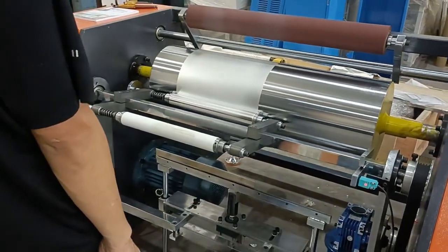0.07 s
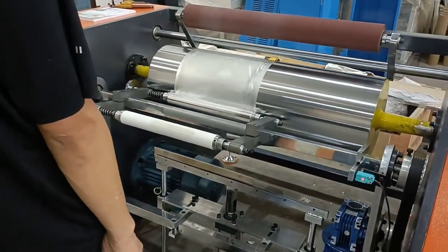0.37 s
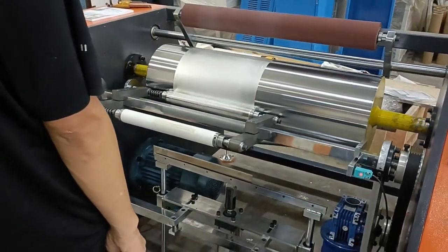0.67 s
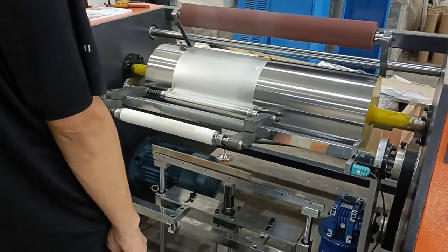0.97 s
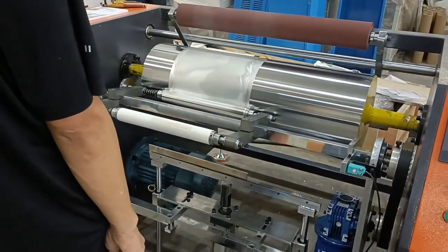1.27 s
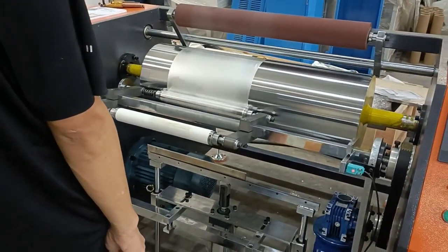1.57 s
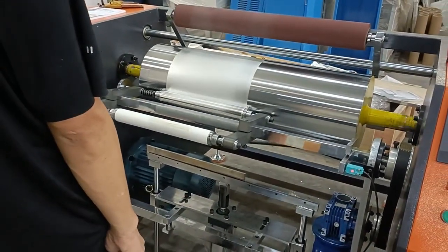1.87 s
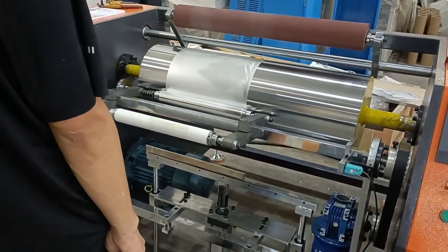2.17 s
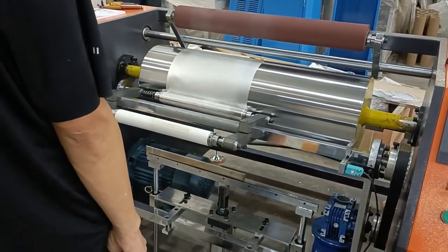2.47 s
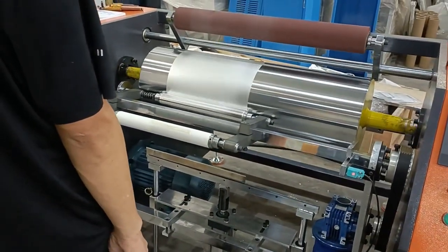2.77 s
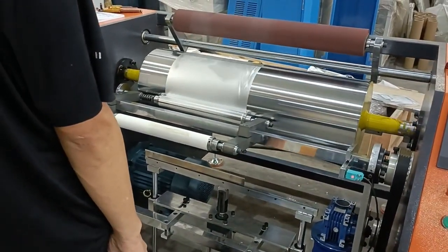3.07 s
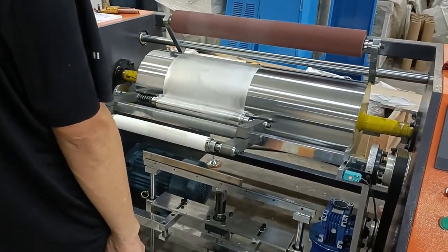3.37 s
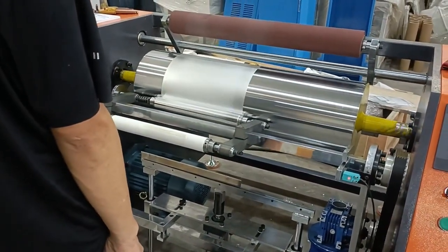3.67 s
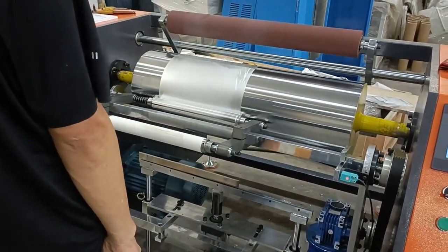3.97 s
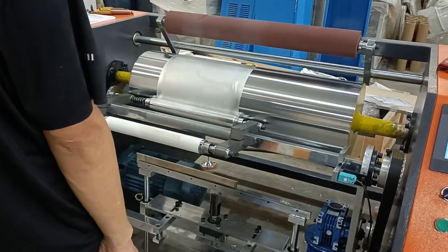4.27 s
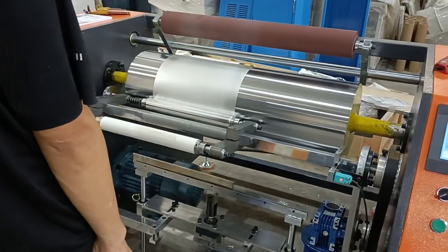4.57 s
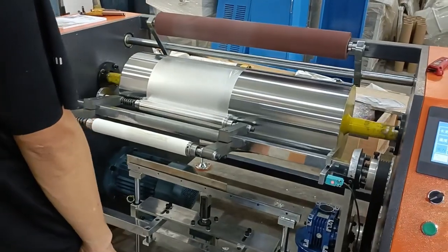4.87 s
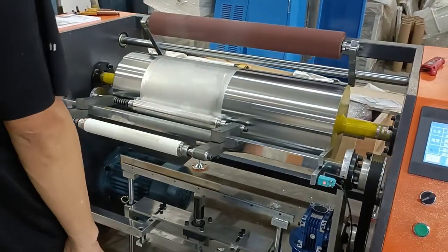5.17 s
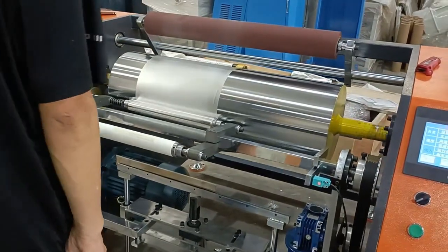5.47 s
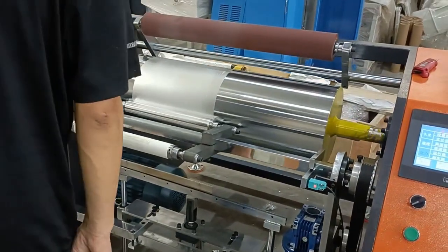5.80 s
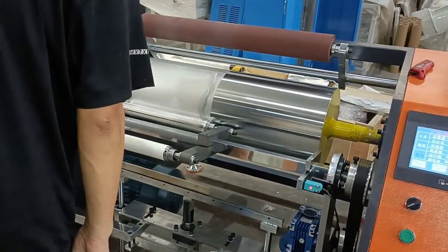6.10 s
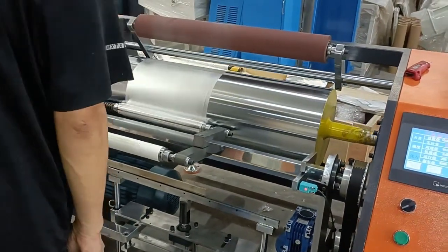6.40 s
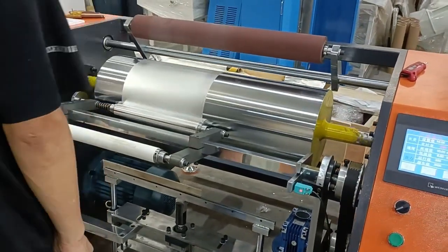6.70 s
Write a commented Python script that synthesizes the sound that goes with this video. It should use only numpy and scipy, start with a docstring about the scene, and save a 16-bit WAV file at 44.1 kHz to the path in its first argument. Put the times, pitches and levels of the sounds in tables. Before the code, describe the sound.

Close to a running rewinding machine, a low hum and rumble mix with a faint whine and the rhythmic, finely crackling hiss of film sliding onto a drum. A faint metallic ring fades at the start. Later, three sharp bursts of compressed air, a little over half a second apart, reverberate through the factory hall from further away. They briefly push the machine sound down, and it slowly recovers as the ringing fades.

```python
"""A film rewinding machine runs steadily in a factory hall, heard in mono from beside its rollers.
From the start the drive hums, the frame rumbles, the inverter whines and the film hisses onto the
drum, swelling with each turn, while metal left ringing by an earlier air blast dies away.
From about 4.5 s, three blasts of compressed air ring through the hall from further off.
They push the recorder's gain down, and the machine creeps back up after them."""
import sys
import numpy as np
from scipy import signal
from scipy.fft import rfft, irfft
from scipy.io import wavfile
from scipy.ndimage import uniform_filter1d

SR = 44100
rng = np.random.default_rng(int(sys.argv[2]) if len(sys.argv) > 2 else 0)


def store_pcm(level_fs):
    """Save levels as 16-bit WAV."""
    pcm = np.round(np.clip(level_fs, -1, 1) * 32767).astype(np.int16)
    wavfile.write(sys.argv[1], SR, np.atleast_2d(pcm).T)


N = 301644
TIME = np.arange(N) / SR
HZ = np.maximum(np.arange(N // 2 + 1) * SR / N, 1)

# The even bed of the hum. Each row: multiple of the shaft rate, level in dB.
STEADY_HARMONICS = [(16, -45), (22, -60), (24, -60), (26, -60)]
# Vibrations that swell and fade. Each row: middle in seconds, length in seconds, level in dB, part.
VIBRATION_SWELLS = [(0.637, 0.075, -28.5, "drone"), (0.832, 0.067, -30, "drone"), (1.1, 0.45, -41, "sixth"),
                    (1.264, 0.2, -28.5, "drone"), (1.45, 1, -37.5, "rumble"), (1.61, 0.15, -28.5, "drone"),
                    (1.77, 0.078, -30, "sixth"), (1.97, .55, -38, "boom"), (1.97, 0.52, -47, "fourth"),
                    (1.992, 0.56, -37, "sixth"), (2.85, .26, -33.5, "ninth"), (3.3, 0.23, -39, "sixth"),
                    (3.633, 0.39, -32, "sixth"), (3.95, 1.0, -53, "fourth"), (4.036, 0.21, -33, "sixth"),
                    (6.45, 0.85, -42, "sixth"), (6.655, .45, -44, "boom")]
# Tone of the frame's low boom. Each row: frequency in Hz, relative level in dB.
BOOM_SPECTRUM = [(25, -37), (45, -31), (62, -21), (84, -9), (98, -7), (125, -6), (150, 0), (185, -8),
                 (260, -33)]
# Tone of the frame's rumble. Each row: frequency in Hz, relative level in dB.
RUMBLE_SPECTRUM = [(120, -6.5), (195, -9), (240, -4), (300, 0.5), (370, -5.5), (500, -12), (620, -13),
                   (800, -14.5), (1000, -19.5), (1250, -23), (1700, -27.5), (2200, -24.5), (3200, -25.5),
                   (8000, -32.5)]
# Resonances of the steel frame. Each row: centre in Hz, width in Hz, boost in dB.
FRAME_RESONANCES = [(242, 10, 3), (314.6, 7.4, 5), (437, 8.5, 2), (1370, 60, 5.5), (1930, 150, 6),
                    (2230, 91, 3)]
# Faint whine of gears and bearings. Each row: pitch in Hz, level in dB against the resting rumble.
GEAR_TONES = [(737, -20), (799, -23), (1084, -26.5), (1414, -37), (1459, -26), (1648, -28.5), (1833, -33.5),
              (1881, -28), (2195, -23.5)]
# The inverter's switching tone and its sidebands. Each row: pitch in Hz, level in dB.
INVERTER_TONES = [(7897.9, -47), (8000.4, -62), (8102.6, -51)]
# Tone of the sliding film. Each row: frequency in Hz, relative level in dB.
HISS_SPECTRUM = [(1000, -21.5), (2200, -10), (2750, -12), (4100, -10), (4700, -4.5), (5500, -2.5),
                 (6300, -4), (7100, -10), (7800, 0), (8450, -3.5), (9200, -5), (10400, -7.5), (12000, -6)]
# The drum rings under the film. Each row: centre in Hz, width in Hz, level in dB against the hiss.
DRUM_RESONANCES = [(3214, 180, -23.5), (3940, 91, -21.5), (4340, 130, -22), (4670, 230, -14.5),
                   (5280, 310, -11.5), (5766, 220, -11), (8500, 430, -12.5), (9370, 160, -23.5)]
# Short scuffs on the drum, mostly where wrinkles brush it; the faint one at 4.07 s comes with a turn's second
# pull. Each row: middle in seconds, level in dB, centre in Hz, half-length in seconds.
WRINKLE_SCUFFS = [(0.73, -32, 5330, 0.011), (0.89, -37, 5500, 0.028), (1.036, -31.5, 8100, 0.017),
                  (1.7, -33, 8500, 0.015), (1.837, -32.5, 8200, 0.022), (2.632, -33, 8500, .014),
                  (2.781, -31, 8650, .012), (2.906, -33.5, 5430, 0.035), (3.5, -41, 5500, 0.015),
                  (3.781, -29.5, 8400, .012), (4.066, -44, 5670, 0.015), (4.4, -37, 5700, .014),
                  (6.66, -36, 8700, .02)]
# Metal left ringing by the blasts; negative starts belong to one already past.
# Each row: start in seconds, centre in Hz, width in Hz, level in dB, seconds to fall 60 dB.
METAL_RINGS = [(-.05, 823, 94, -37.5, 2.6), (-.05, 1030, 60, -46.5, 2.6), (-.05, 1450, 130, -43, 1.5),
               (-.05, 2050, 900, -38.5, 1.1), (-.05, 2450, 40, -40.5, 1.1), (-.05, 4460, 35, -38, 1.7),
               (-.05, 4630, 200, -51, 1.7), (-.05, 6300, 40, -50, 2.4), (4.56, 783, 45, -25, 0.8),
               (5.12, 1032, 25, -37, 3.4), (5.755, 995, 34.6, -26, 1.96), (5.755, 3660, 131.5, -28, 2.1)]
# The air blasts. Each row: start in seconds, level in dB, rise in seconds, time open in seconds,
# closing decay in seconds, pressure sag in dB per second.
AIR_BLASTS = [(4.54, -12, 0.071, 0.09, 0.14, 4), (5.097, -7.5, 0.086, 0.066, 0.2, 29),
              (5.732, -8.5, 0.076, 0.11, 0.12, 26)]
# Tone of the air jet. Each row: frequency in Hz, relative level in dB.
JET_SPECTRUM = [(300, -14), (450, -10.5), (580, -16.5), (800, -10), (1700, -5.5), (2600, -3), (4200, -2.5),
                (5000, 0), (6000, -5.5), (7000, -8), (7900, -4), (9000, -10), (10000, -17.5), (12000, -20)]
# Resonances stirred by the jet.
# Each row: centre in Hz, width in Hz, then boost or cut in dB for the first, second and third blast.
JET_RESONANCES = [(768, 85, 12, 10, 0), (1004, 117, 6, 8, 6), (1118, 117, 10.5, 8.5, 3),
                  (1370, 98, 6, 5.5, -7), (1504, 92, 3, -4, 7.5), (2000, 63, 4, -2.5, -8),
                  (2288, 170, 2.5, 1, 5.5), (2380, 45, 9, 0, 9.5), (2430, 35, -4, 0, 7.5),
                  (2980, 160, 5.5, -6, 7), (3080, 73, 4, 3, 0), (3310, 80, 4.5, -4, -2),
                  (3370, 110, -4, 3.5, 0.5), (3620, 200, -1, 3, 8), (3644, 110, 5, -3, 2),
                  (3790, 70, 7, 7, 7), (4200, 67, 7, -12, 1), (4500, 36, 4, 1, -12), (4370, 120, 3, 5, 4),
                  (4770, 96, 6.5, 8.5, 4), (4890, 155, 4.5, 3, 9.5), (5180, 97, 3, 8, 6),
                  (5500, 160, 5, -2, 2), (5580, 33, -3, -2, 3), (6160, 210, 7, 8, 12.5),
                  (6520, 72, -6, 11, 5), (7710, 120, 4, 12, -4), (8700, 64, -4, 1, 4),
                  (9700, 4200, -1, -7, -0.5)]
# The hall's tail. Each row: frequency in Hz, seconds to fall 60 dB.
HALL_DECAY = [(300, 6), (750, 3.5), (1050, 2.53), (1600, 1.29), (3000, 1.24), (5000, 1.86), (8000, 0.88),
              (12000, 0.47)]

SHAFT_HZ, PANEL_HZ = 17.95, 149
BOOM_REST_DB, RUMBLE_REST_DB = -46, -36
TURN_S, FIRST_TIGHTENING_S = 0.93, 0.6
TIGHTEN_S, TAUT_S, SLACKEN_S = 0.16, 0.27, 0.19
SECOND_PULL_S, SECOND_PULL_LENGTH_S, SECOND_PULL_SHARE = 0.645, 0.22, 0.68
SLACK_HISS_DB, TENSION_BOOST_DB = -38.5, 5.5
JUDDERS_PER_TURN, JUDDER_DB = 14, 0.47
HALL_SEND_DB = -4.5
DUCK_THRESHOLD_DB, DUCK_SHARE, DUCK_ATTACK_S, RECOVERY_DB_PER_S = -23, 0.6, 0.021, 4.5
CUTOFF_HZ = 12100


def from_db(db):
    """Decibels to gain."""
    return 10 ** (np.asarray(db) / 20)


def at_hz(points, hz):
    """Read a table on a log-frequency axis."""
    frequencies, values = np.transpose(points)
    return np.interp(np.log(hz), np.log(frequencies), values)


def resonance(hz, width_hz):
    """Magnitude response of one resonance, 1 at its peak."""
    return 1 / np.sqrt(1 + ((HZ ** 2 - hz ** 2) / (HZ * width_hz)) ** 2)


def bell_eq(modes):
    """A flat response with a bell-shaped boost or cut at each resonance."""
    return from_db(sum(db * resonance(hz, width) ** 2 for hz, width, db in modes))


def noise(response):
    """Noise with the given magnitude response, rms 1."""
    shaped = irfft(rfft(rng.standard_normal(N)) * response, N)
    return shaped / np.sqrt(np.mean(shaped ** 2) + 1e-20)


def noise_band(hz, width_hz):
    """A band of noise around one pitch, rms 1."""
    return noise(resonance(hz, width_hz) ** 2)


def coloured(spectrum, eq=1):
    """Noise of rms 1 shaped by a spectrum table and an EQ, rolled off beyond the table's ends."""
    skirts = np.minimum(1, HZ / spectrum[0][0]) ** 2 * np.minimum(1, spectrum[-1][0] / HZ) ** 2
    return noise(from_db(at_hz(spectrum, HZ)) * skirts * eq)


def drift(rate_hz):
    """Smooth random modulation, rms 1, mostly slower than the given rate."""
    return noise(1 / (1 + (HZ / rate_hz) ** 2) ** 2)


def tone(hz, wander_rad, rate_hz):
    """A sine of rms 1 with a wandering phase."""
    return np.sqrt(2) * np.sin(2 * np.pi * hz * TIME + wander_rad * drift(rate_hz))


def vibration(part, rest_db, flutter_db, rate_hz):
    """Envelope of one vibrating part: it flutters about its resting level, and swells add power."""
    power = from_db(rest_db + flutter_db * drift(rate_hz)) ** 2
    for middle, length, db, swelling_part in VIBRATION_SWELLS:
        if swelling_part == part:
            swell = from_db(db) * np.exp(-(2 * (TIME - middle) / length) ** 2)
            power += swell ** 2
    return np.sqrt(power)


def drive_hum():
    """Shaft harmonics hum; a frame panel drones just below the ninth and beats with it."""
    fourth = vibration("fourth", rest_db=-59, flutter_db=1.5, rate_hz=6)
    fourth *= tone(4 * SHAFT_HZ, wander_rad=0.67, rate_hz=4)
    sixth = vibration("sixth", rest_db=-48.5, flutter_db=4, rate_hz=8.3)
    sixth *= tone(6 * SHAFT_HZ, wander_rad=0.47, rate_hz=2.6)
    ninth = vibration("ninth", rest_db=-40.5, flutter_db=1.5, rate_hz=18)
    ninth *= tone(9 * SHAFT_HZ, wander_rad=0.42, rate_hz=5.2)
    panel = vibration("drone", rest_db=-50, flutter_db=5, rate_hz=6.4)
    panel *= tone(PANEL_HZ, wander_rad=0.75, rate_hz=3)
    bed = sum(from_db(db) * tone(multiple * SHAFT_HZ, wander_rad=0.57, rate_hz=2.9)
              for multiple, db in STEADY_HARMONICS)
    return fourth + sixth + ninth + panel + bed


def frame_rumble():
    """Rolling bearings and belts shake the steel frame: a low boom under a broad rumble."""
    boom = vibration("boom", BOOM_REST_DB, flutter_db=4, rate_hz=6.8)
    rumble = vibration("rumble", RUMBLE_REST_DB, flutter_db=0.84, rate_hz=5.2)
    return boom * coloured(BOOM_SPECTRUM) + rumble * coloured(RUMBLE_SPECTRUM, bell_eq(FRAME_RESONANCES))


def whine():
    """Gear teeth sing faintly; the motor windings sing at the inverter's switching frequency."""
    gears = sum(from_db(db + 1.23 * drift(4.5)) * tone(hz, wander_rad=0.9, rate_hz=5.1)
                for hz, db in GEAR_TONES)
    windings = sum(from_db(db + 1.4 * drift(3.5)) * tone(hz, wander_rad=2.6, rate_hz=3.3)
                   for hz, db in INVERTER_TONES)
    return from_db(RUMBLE_REST_DB) * gears + windings


def film_tension():
    """Tension from 0 to 1: each turn it builds, holds and eases, then gives a weaker second pull."""
    age = (TIME - FIRST_TIGHTENING_S) % TURN_S
    main_pull = np.interp(age, np.cumsum([0, TIGHTEN_S, TAUT_S, SLACKEN_S]), [0, 1, 1, 0])
    second_pull = np.exp(-(2 * (age - SECOND_PULL_S) / SECOND_PULL_LENGTH_S) ** 2)
    return main_pull + SECOND_PULL_SHARE * second_pull


def film_hiss():
    """Film slides on with a fine crackle and rings the drum; when taut it is louder and sizzles."""
    tension = film_tension()
    judder = np.cos(2 * np.pi * JUDDERS_PER_TURN * (TIME - 0.014) / TURN_S)
    rubbing = from_db(SLACK_HISS_DB + TENSION_BOOST_DB * tension + JUDDER_DB * judder + 1.3 * drift(7.6))
    drum = sum(from_db(db + 2.4 * drift(18)) * noise_band(hz, width) for hz, width, db in DRUM_RESONANCES)
    crackle = from_db(1.05 * drift(56) + 0.51 * drift(1400))
    sizzle = from_db(-13.5) * tension * noise_band(9600, width_hz=6300)
    hiss = from_db(-0.14) * coloured(HISS_SPECTRUM)
    return rubbing * (crackle * (hiss + sizzle) + drum)


def ringing_metal():
    """Clusters of metal resonances build up with a blast and outlast it."""
    rings = 0
    for start, hz, width, db, t60 in METAL_RINGS:
        age = np.maximum(TIME - start, 0)
        envelope = np.minimum(age / 0.046, 1) * np.exp(-np.log(1000) * age / t60)
        rings += from_db(db) * envelope * noise_band(hz, width)
    return rings


def wrinkle_scuffs():
    """Short, bright scuffs brush over the drum, mostly from wrinkles in the film."""
    scuffs = 0
    for middle, db, hz, half_length in WRINKLE_SCUFFS:
        envelope = np.exp(-((TIME - middle) / half_length) ** 2)
        scuffs += from_db(db) * envelope * noise_band(hz, width_hz=1900)
    return scuffs


def air_blasts():
    """A valve opens and shuts; the sputtering jet stirs resonances as its pressure sags."""
    jets = 0
    mode_hz, mode_width, *boosts_by_blast = np.transpose(JET_RESONANCES)
    for (start, db, rise, held, closing, sag), boosts in zip(AIR_BLASTS, boosts_by_blast):
        jet = coloured(JET_SPECTRUM, bell_eq(zip(mode_hz, mode_width, boosts)))
        sputter = from_db(1.04 * drift(160))
        age = np.maximum(TIME - start, 0)
        attack = np.sin(np.pi / 2 * np.minimum(age / rise, 1)) ** 2
        release = np.exp(-np.maximum(age - held, 0) / closing)
        jets += from_db(db - 1 - sag * age) * attack * release * sputter * jet
    return jets


def hall(x):
    """Diffuse echoes bloom quickly and die at each band's own pace, the lows last."""
    t, tail = TIME[:2 * SR], 0
    edges_hz = np.geomspace(200, 14000, 17)
    for low, high in zip(edges_hz, edges_hz[1:]):
        bandpass = signal.butter(2, [low, high], "band", fs=SR, output="sos")
        band = signal.sosfilt(bandpass, rng.standard_normal(len(t)))
        t60 = at_hz(HALL_DECAY, np.sqrt(low * high))
        tail += band * np.exp(-np.log(1000) * t / t60)
    tail *= 1 - np.exp(-t / 0.0035)
    return signal.fftconvolve(x, tail / np.sqrt(np.sum(tail ** 2)))[:len(x)]


def automatic_gain(x):
    """The recorder quickly ducks by a share of any level over its threshold, then creeps back up."""
    power = uniform_filter1d(x[0] ** 2, size=SR // 40)
    level_db = 10 * np.log10(np.maximum(power, 1e-12))
    cut_db = DUCK_SHARE * np.maximum(level_db - DUCK_THRESHOLD_DB, 0)
    recovery_db = RECOVERY_DB_PER_S * TIME
    held_db = np.maximum.accumulate(cut_db + recovery_db) - recovery_db
    pole = np.exp(-1 / (DUCK_ATTACK_S * SR))
    return x * from_db(-signal.lfilter([1 - pole], [1, -pole], held_db))


def scene():
    """The machine close and dry, the blasts with the hall's reverb, the same in both channels."""
    mono = drive_hum() + frame_rumble() + whine() + film_hiss() + ringing_metal() + wrinkle_scuffs()
    blasts = air_blasts()
    mono += blasts + from_db(HALL_SEND_DB) * hall(blasts)
    return np.array([mono, mono])


def record(dry):
    """The automatic gain ducks the mix under each blast; the top is cut steeply."""
    lowpass = signal.ellip(14, 0.1, 90, CUTOFF_HZ, fs=SR, output="sos")
    return signal.sosfilt(lowpass, automatic_gain(dry))


dry = scene()
out = record(dry)
store_pcm(out)
```